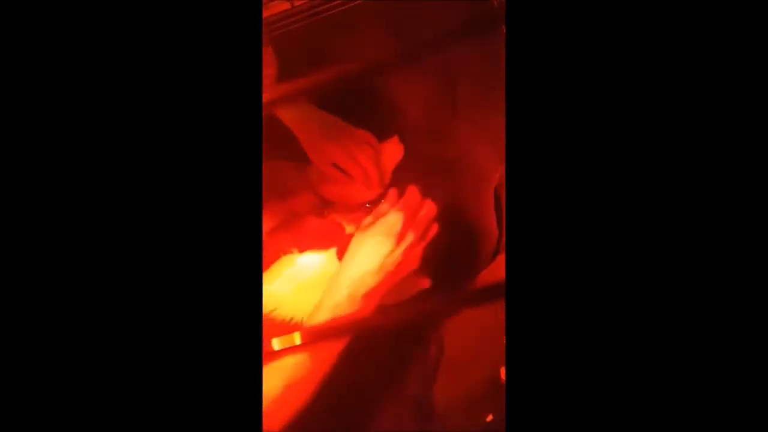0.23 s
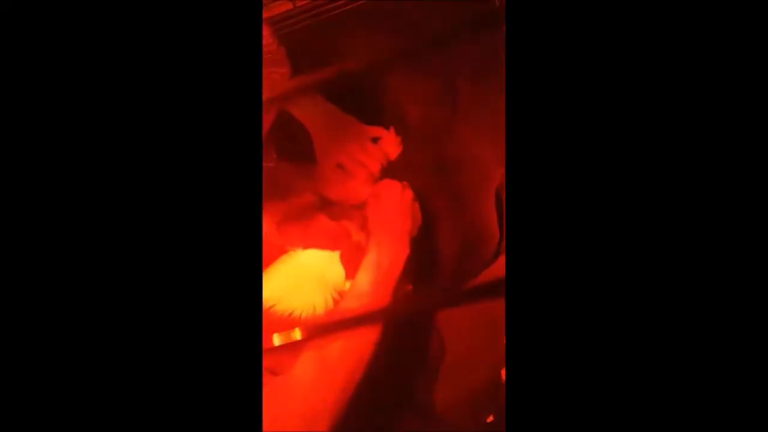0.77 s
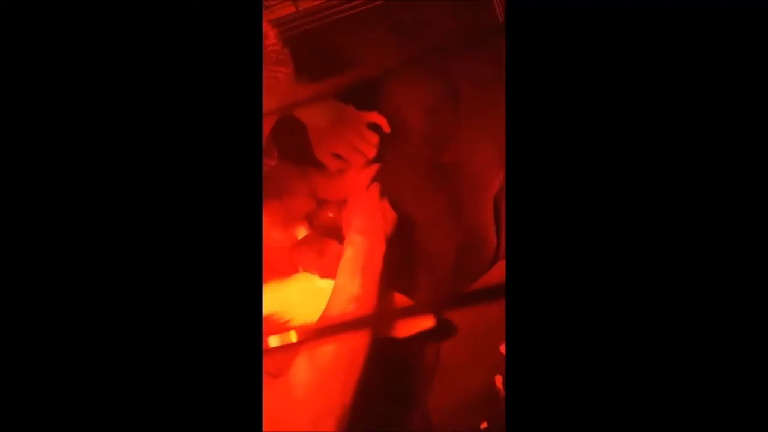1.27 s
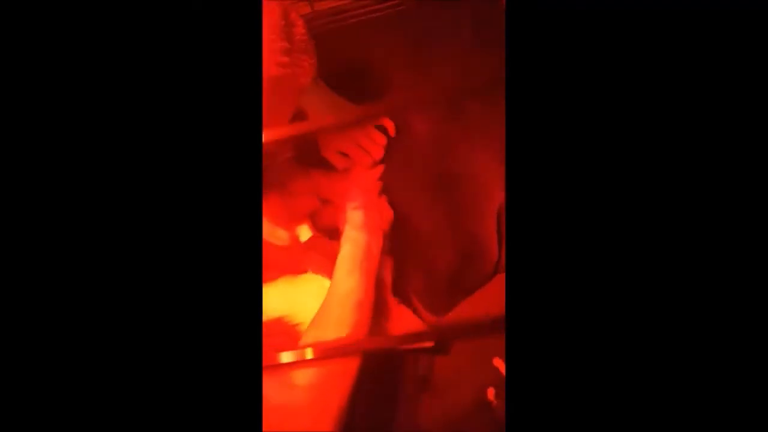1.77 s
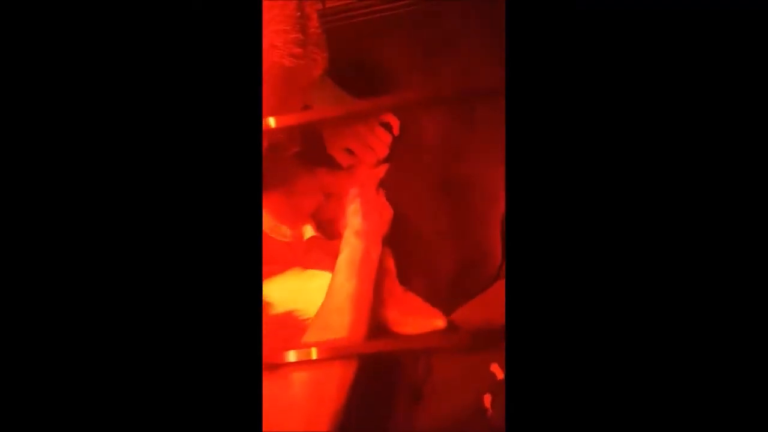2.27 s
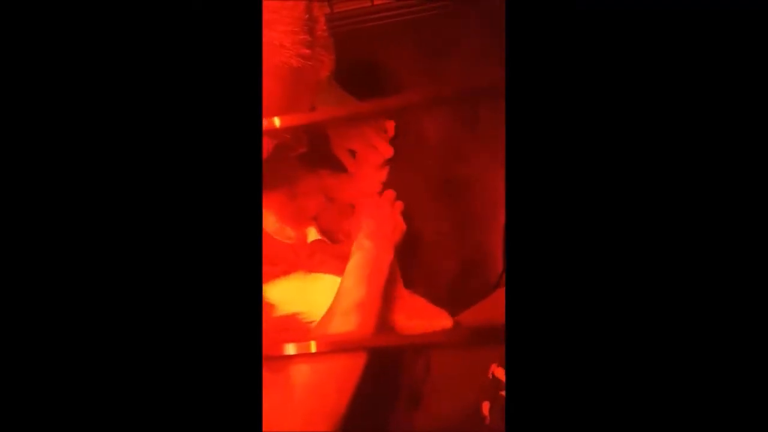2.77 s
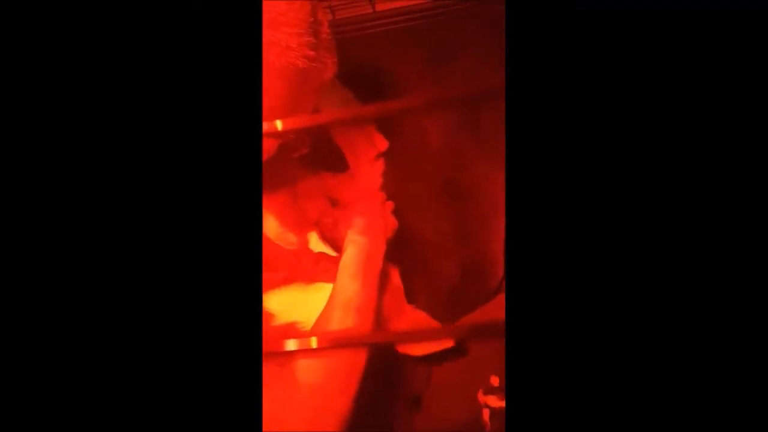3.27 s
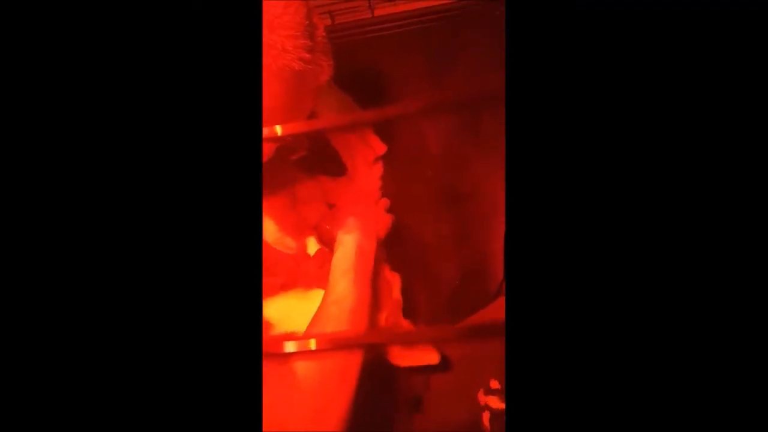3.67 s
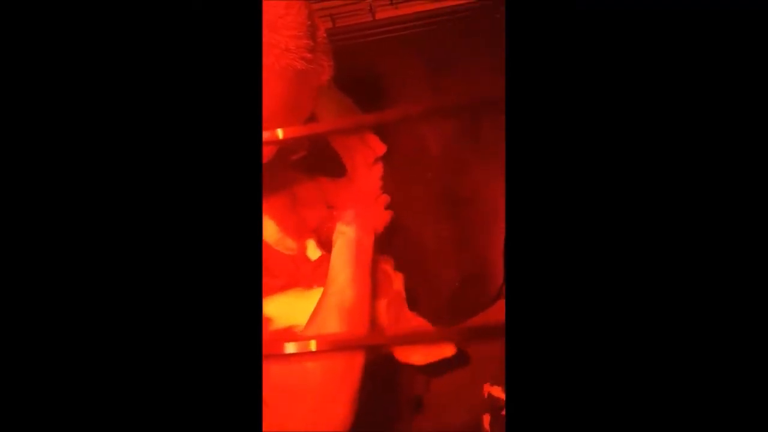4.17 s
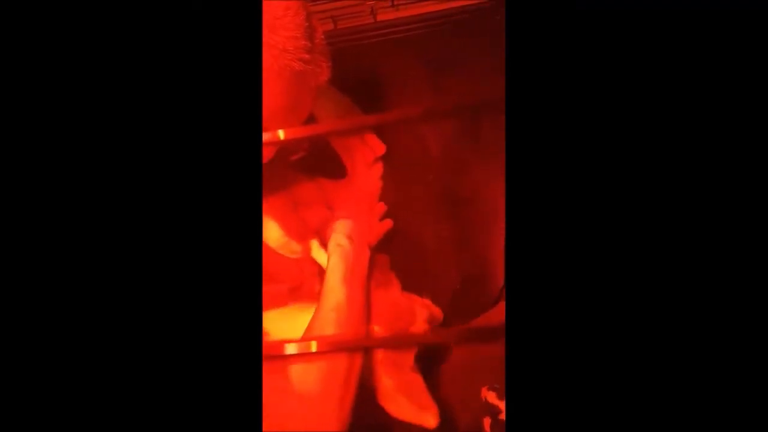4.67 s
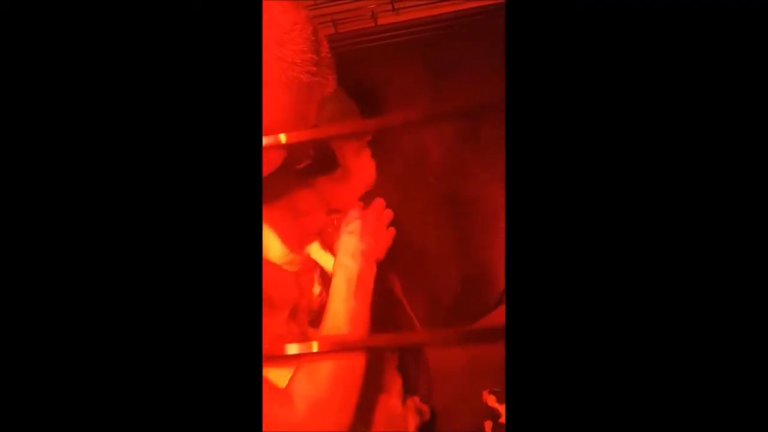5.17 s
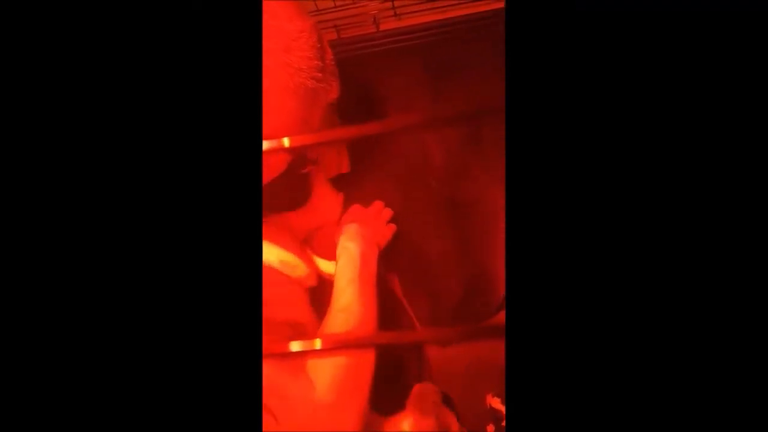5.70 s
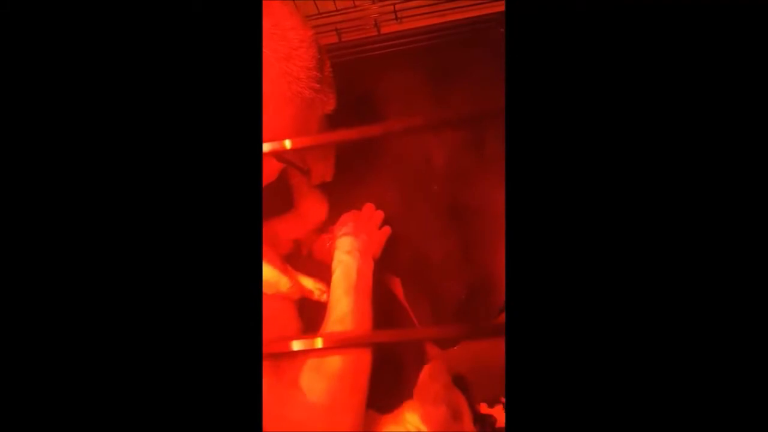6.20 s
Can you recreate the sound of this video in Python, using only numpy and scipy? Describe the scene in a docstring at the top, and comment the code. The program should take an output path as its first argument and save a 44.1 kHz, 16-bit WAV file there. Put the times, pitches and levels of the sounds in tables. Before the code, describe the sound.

Tiny puppy being handled: low hoarse grunts, gliding whines, one piercing squeal, then raspy groans among soft knocks and cloth rustles.

```python
"""In a bedding-lined pen indoors a newborn puppy is handled and cries.
Clear gliding whines, one rising to a squeal, are summed partials over a pulsed breath; groans are jittery fold beats.
Cracks, airy rasps and a faint whistle join them. Hands and paws bump (short two-mode rings) and rustle the
bedding (grainy noise). The room hisses softly in noise bands; a low hum fades in and wavers underneath."""
import sys
import numpy as np
from scipy import signal
from scipy.fft import rfft, irfft
from scipy.io import wavfile
from scipy.ndimage import uniform_filter1d, map_coordinates

SR = 44100
rng = np.random.default_rng(int(sys.argv[2]) if len(sys.argv) > 2 else 0)


def log_audio(samples):
    """Write samples as a 16-bit WAV file to the path given in sys.argv[1]."""
    # one column per channel
    frames = np.atleast_2d(samples).T
    # limit to full scale, then quantise
    limited = np.clip(frames, -1, 1)
    pcm = np.round(limited * 32767).astype(np.int16)
    wavfile.write(sys.argv[1], SR, pcm)


N = 284004
CUTOFF_HZ = 16150

# Clear cries, one list per cry. Each row: time in seconds, pitch in Hz, levels of the
# fundamental, octave and third partial in dB.
CRIES = [
    [(0.87, 586.5, -74, -77, -80), (0.886, 604.2, -55, -59, -77), (0.928, 671.9, -55.5, -49, -63),
     (0.956, 753.5, -48.5, -49, -65.5), (0.996, 853.7, -51, -45, -66), (1.042, 939.0, -49.5, -47, -71),
     (1.07, 942, -62.5, -55.5, -63), (1.138, 922.5, -47.5, -50.5, -67), (1.228, 1010, -68.5, -51.5, -73),
     (1.24, 1023, -50, -57, -77), (1.254, 1042, -55, -48.5, -89), (1.276, 1024, -60, -50, -89),
     (1.31, 1061, -53.5, -52.5, -83), (1.394, 955.5, -55.5, -49.5, -67), (1.458, 931.5, -59.5, -58, -80),
     (1.48, 953.3, -90, -72, -90)],
    [(2.0, 854, -77, -62, -85), (2.026, 855.5, -48.5, -48, -77), (2.048, 1026, -74, -58, -82),
     (2.078, 1065, -44.5, -43.5, -69), (2.104, 1120, -40.5, -50, -75), (2.122, 1124, -46, -51.5, -67),
     (2.144, 1180, -29.5, -41, -68), (2.178, 1160, -34.5, -49, -62.5), (2.186, 1141, -36.5, -54, -67),
     (2.23, 1174, -39.5, -43.5, -66), (2.248, 1147, -40.5, -53, -63), (2.278, 1058, -48.5, -46, -61),
     (2.32, 938, -53.5, -51.5, -66.5), (2.43, 783, -48, -51, -57.5), (2.44, 775.7, -47.5, -50, -68),
     (2.46, 671, -53.5, -50.5, -56), (2.54, 610.1, -53, -49, -57.5), (2.584, 696.0, -52.5, -50.5, -61),
     (2.6, 823.4, -51.5, -51, -59.5), (2.694, 821.5, -50.5, -58, -59.5), (2.78, 882.8, -58, -51, -82),
     (2.83, 946.7, -81, -84, -95)],
    [(3.3, 939, -58, -56, -97), (3.314, 1014, -51, -59.5, -72), (3.356, 1183, -38.5, -46, -87),
     (3.372, 1305, -33, -49, -69)] + [(3.382, 1281, -37, -44, -53), (3.388, 1233, -39, -41.5, -50),
     (3.41, 1261, -42.5, -30.5, -47), (3.442, 1288, -37, -26.5, -42.5), (3.488, 1337, -49, -30, -47),
     (3.496, 1344, -46, -38.5, -39), (3.504, 1338, -64, -24.5, -52), (3.514, 1281, -41.5, -32.5, -48),
     (3.556, 1292, -39.5, -37, -38.5), (3.566, 1262, -40, -47, -56), (3.572, 1287, -42, -38, -49),
     (3.58, 1275, -36.5, -36.5, -58), (3.59, 1297, -33, -62, -58)] + [(3.605, 1306, -35, -56, -68),
     (3.617, 1265, -34, -55, -84), (3.651, 1234, -40, -49, -73), (3.735, 1192, -36.5, -48, -80),
     (3.775, 1136, -42.5, -51.5, -77), (3.817, 1011, -48.5, -45.5, -60), (3.901, 967, -44, -53.5, -57),
     (3.927, 954, -44.5, -48.5, -61), (3.969, 971, -44.5, -60, -55.5), (4.003, 957, -46, -45.5, -69),
     (4.035, 965, -45.5, -57, -62), (4.067, 935, -57.5, -40, -81), (4.095, 921, -42, -47, -81),
     (4.113, 890, -47, -44, -57), (4.121, 902, -41.5, -45, -65.5), (4.197, 862.6, -50, -47.5, -58.5),
     (4.261, 903.4, -49, -44.5, -68), (4.36, 794, -61, -72, -72)],
    [(5.8, 891.4, -67, -65, -89), (5.826, 912.6, -50.5, -84, -84), (5.94, 941.4, -69, -74, -87),
     (5.982, 900.8, -58, -84, -89), (6.024, 964.6, -62, -65, -87), (6.066, 1086, -53, -75, -94),
     (6.098, 1063, -50.5, -52.5, -91), (6.19, 953.3, -58.5, -76, -80)] + [(6.21, 952, -54.5, -57, -86),
     (6.24, 935, -55, -50, -85), (6.27, 903, -56, -50.5, -82), (6.31, 928, -51, -52.5, -85),
     (6.378, 913, -60, -46, -82), (6.424, 867, -55, -53, -87), (6.44, 906, -59, -66, -84)],
]
# Throat colour, mouth open. Each row: frequency in Hz, relative level in dB.
THROAT = [(210, -68.5), (350, -26.5), (652, -9), (737, -5.5), (912, -3.5), (1210, 0), (1490, -8.5),
          (1730, 3), (1980, -7.5), (2240, 0.5), (2660, -19), (4000, -51), (5200, -71), (8800, -120)]


def from_db(db):
    """Decibels to gain."""
    return 10 ** (np.asarray(db) / 20)


def rms_one(x):
    """Scale to rms 1."""
    return x / np.sqrt(np.mean(x ** 2) + 1e-20)


def in_time(rows):
    """Every column after the time column, interpolated sample by sample."""
    s, *columns = np.transpose(rows)
    return [np.interp(np.arange(N) / SR, s, column) for column in columns]


def span(rows):
    """First and last time of a table."""
    return rows[0][0], rows[-1][0]


def per_cry(ends):
    """A value given at the start and end of each cry, sample by sample."""
    rows = []
    for cry, pair in zip(CRIES, ends):
        rows += zip(span(cry), pair)
    return in_time(rows)[0]


def sounding(spans, fade_s):
    """1 while any span (start s, end s) lasts, 0 between, with soft edges."""
    t = np.arange(N) / SR
    on = sum((t >= start) & (t <= end + .011) for start, end in spans) > 0
    return uniform_filter1d(on * 1., size=int(fade_s * SR), mode="nearest")


def at_hz(points, hz):
    """A spectrum in dB read on a log-frequency axis."""
    points = np.array(points)
    return np.interp(np.log(hz), np.log(points[:, 0] + 1), points[:, 1])


def drift(corner_hz):
    """Random wander of rms 1: noise through two equal poles at corner_hz, run at SR / 8."""
    r = np.exp(-16 * np.pi * corner_hz / SR)
    noise = rng.standard_normal(N // 8 + 8002)
    slow = signal.lfilter([1], [1, -2 * r, r * r], noise)[8000:]  # settled part
    return np.interp(np.arange(N) / 8, np.arange(len(slow)), rms_one(slow))


def narrow(hz, corner_hz):
    """Noise squeezed into a thin line around a fixed or moving centre; rms about 1."""
    phase = 2 * np.pi * np.cumsum(hz * np.ones(N)) / SR
    return drift(corner_hz) * np.cos(phase) + drift(corner_hz) * np.sin(phase)


def coloured(x, spectrum):
    """Impose a spectrum in dB per Hz."""
    hz = np.maximum(np.arange(N // 2 + 1) * SR / N, 1)
    return irfft(rfft(x) * from_db(at_hz(spectrum, hz)), N)


def placed(x, pan_db):
    """Nearer the right port: the left hears it a little later; pan_db is left over right."""
    left_lag_s = 0.00013
    late = map_coordinates(x, [np.arange(N) - left_lag_s * SR], order=3)
    return np.array([late * from_db(pan_db / 2), x * from_db(-pan_db / 2)])


def room_noise(patchy_db):
    """Half-octave bands of stereo noise; the low bands shuffle in lumps, the high ones hiss more smoothly."""
    # Each row: time in seconds, low shuffle and hiss in dB (taken about their means, weighted per band).
    room = [(0.0, -69.5, -75), (0.6, -71, -78), (0.88, -70.5, -78), (1.09, -67.5, -71), (1.45, -72, -69),
            (1.7, -72, -80.5), (2.22, -68.5, -72), (2.64, -68.5, -74), (2.83, -72, -78), (3.34, -71.5, -81),
            (3.53, -68, -82.5), (4.11, -71.5, -71), (4.43, -71.5, -74), (4.63, -69.5, -80.5),
            (4.97, -69, -82.5), (5.76, -67.5, -80), (6.44, -68.5, -79)]
    # Room air colour. Each row: frequency in Hz, relative level in dB per Hz.
    air_colour = [(18, -21), (30, 3), (70, -7), (120, -5.5), (340, -5), (650, -9.5), (800, -10),
                  (1720, -10), (2490, -15), (4000, -21.5), (7000, -23), (9500, -29), (13000, -25),
                  (16000, -23.5)]
    # Each row: frequency in Hz, left-right correlation.
    likeness = [(60, 0.53), (180, 0.46), (550, 0.48), (1650, 0.19), (4970, -0.07), (15000, 0.026)]
    shared_wander = .35  # patchiness common to all bands, against 1 for each band's own
    low_db, hiss_db = in_time(room)
    low_db, hiss_db = low_db - low_db.mean(), hiss_db - hiss_db.mean()
    white = coloured(rng.standard_normal((4, N)), air_colour).reshape(2, 2, N)
    edges_hz = 16.22 * 2 ** np.arange(0, 10.1, .5)
    noise, together = 0, drift(0.99)
    for k, (low_hz, high_hz) in enumerate(zip(edges_hz, edges_hz[1:])):
        band = signal.butter(2, [low_hz, high_hz], "band", fs=SR, output="sos")
        mid, side = signal.sosfilt(band, white[k % 2])
        alike = np.clip(at_hz(likeness, np.sqrt(low_hz * high_hz)), -1, 1)
        treble = np.clip(np.log2(low_hz / 400) / 10.0, 0, 1)
        level_db = (1.5 - treble) * low_db + treble * hiss_db
        lumps_db = patchy_db * (2 - 1.13 * treble) * (shared_wander * together + drift(11.6))
        stereo = np.sqrt(1 + alike) * mid + np.sqrt(1 - alike) * side * [[1], [-1]]
        noise = noise + from_db(level_db + lumps_db) * stereo
    return from_db(-61.5) * rms_one(noise) * from_db([[-.7], [.7]])


def hum():
    """A steady low tone plus a narrow noise halo that makes it waver; same waveform in both ports."""
    # Each row: time in seconds, rms level in dB.
    hum_level = [(0.0, -93), (0.6, -92), (1.3, -76), (1.6, -72), (2.06, -68), (3.3, -67.5), (3.9, -67),
                 (6.44, -67.5)]
    hum_hz, halo_corner_hz, halo_share = 49, 3.2, .2
    steady = np.sin(2 * np.pi * hum_hz * np.arange(N) / SR)
    tone = rms_one(steady + halo_share * narrow(hum_hz, halo_corner_hz))
    return from_db(in_time(hum_level)[0]) * tone * from_db([[-1.0], [1.0]])


def pen(x):
    """Walls and bars of the pen: convolution with a short dull noise tail, different in each channel."""
    cut_hz, tail_db, t60_s = 2500, -17, .12
    t = np.arange(SR // 3) / SR
    tail = rng.standard_normal((2, len(t))) * from_db(-60 * t / t60_s) * (t > .002)
    tail = signal.sosfilt(signal.butter(1, cut_hz, fs=SR, output="sos"), tail)
    tail = tail / np.sqrt(np.sum(tail ** 2) / 2)
    return from_db(tail_db) * signal.fftconvolve(x, tail, axes=1)[:, :N]


def rustles(grain_db, rise_s):
    """Bedding cloth crackles: grainy noise that swells fast and dies away exponentially."""
    # Each row: start in seconds, level in dB, t60 in seconds.
    rustle_rows = [(0.711, -66, 0.2), (1.5527, -79, 0.14), (1.7304, -79, 0.053), (1.7585, -66, 0.06),
                   (4.452, -63, 0.16), (4.621, -53, 0.13), (4.64, -62, 0.43), (5.174, -71, 0.15),
                   (5.2196, -53.5, 0.39), (5.7244, -59, 0.2), (5.744, -51, 0.12), (5.7789, -58.5, 0.23),
                   (6.0993, -59, 0.16)]
    # Each row: frequency in Hz, relative level in dB per Hz.
    cloth_colour = [(300, 4.5), (1000, 7.5), (3000, 0), (8000, -8), (16000, -15)]
    t = np.arange(N) / SR
    shape = 0
    for s, db, t60_s in rustle_rows:
        decay = from_db(db - 60 * np.abs(t - s) / max(t60_s, .01))
        shape = shape + np.clip((t - s) / rise_s, 0, 1) * decay
    grains = rng.standard_normal(N) * from_db(grain_db * drift(430))
    return placed(rms_one(coloured(grains, cloth_colour)) * shape, -4.0)


def struck(events, t60_s, cycles, pan_db, puff_share):
    """Each (s, dB, Hz) event rings at two modes with a dull noise puff; t60 is t60_s plus some cycles."""
    second_ratio, second_db = 1.53, -7
    length = 4410
    out, t = np.zeros(N + length), np.arange(length) / SR
    dull = signal.butter(3, 1700, fs=SR, output="sos")
    puffs = rms_one(signal.sosfilt(dull, rng.standard_normal((len(events), length))))
    for (s, db, hz), puff in zip(events, puffs):
        upper = from_db(second_db) * np.sin(2 * np.pi * second_ratio * hz * t)
        ring = np.sin(2 * np.pi * hz * t) + upper
        blow = (ring + puff_share * puff) * from_db(db - 60 * t / (t60_s + cycles / hz))
        soft_contact = np.minimum(t * hz / 1.04, 1)  # full after about one cycle
        out[round(s * SR):][:length] += blow * soft_contact
    return placed(out[:N], pan_db)


def bumps():
    """Hands and paws bump: short impulses, each ringing at its own pitch."""
    # Each row: start in seconds, level in dB, ring in Hz.
    bump_rows = [(0.104, -45, 205), (0.233, -41.5, 577), (0.711, -52.5, 1080), (0.951, -42, 414.6),
                 (1.054, -42, 148.7), (1.109, -48, 303), (1.432, -51, 151.2), (1.501, -52, 580),
                 (1.552, -57, 960), (1.62, -46, 183), (1.846, -44.5, 170.4), (2.846, -48.5, 148.5),
                 (3.093, -36.5, 908), (3.248, -54, 904), (3.499, -45, 160), (4.154, -43, 540),
                 (4.183, -44.5, 176.3), (4.214, -47, 135), (4.449, -40.5, 596), (4.461, -40, 652),
                 (4.477, -50.5, 327), (5.044, -50, 184), (5.19, -41.5, 192.2), (5.1765, -37, 402),
                 (5.2215, -38.5, 681), (5.229, -51, 133.5), (5.67, -48, 127), (5.742, -36, 417.3),
                 (5.825, -35, 414.5), (6.086, -42, 357)]
    return struck(bump_rows, t60_s=.025, cycles=3.0, pan_db=-1.5, puff_share=0.45)


def wheeze():
    """Air through a narrow gap: a faint breathy whistle of narrow noise on a wandering centre."""
    # Each row: time in seconds, rms level in dB.
    whistle_level = [(4.86, -81), (4.92, -68.5), (5.168, -67), (5.2, -75)]
    centre_hz, corner_hz = 1500 * (1 + .012 * drift(12.1)), 70
    whistle = narrow(centre_hz, corner_hz) * from_db(in_time(whistle_level)[0])
    return placed(whistle * sounding([span(whistle_level)], .03), -7.5)


def rasp():
    """A dry, airy rasp: grainy upper-middle noise that swells and fades linearly in dB."""
    # Each row: peak time in seconds, peak rms level in dB, rise and fall in seconds per range_db.
    rasp_rows = [(1.156, -56, 0.075, 0.098), (5.094, -69.5, .07, 0.073), (5.226, -56, 0.052, 0.08),
                 (5.746, -49, 0.034, .12), (6.2, -68, 0.14, 0.057)]
    # Each row: frequency in Hz, relative level in dB per Hz.
    rasp_colour = [(1800, -1), (2400, 3), (3300, 1), (4200, -7), (7000, -38), (12000, -51)]
    range_db = 24
    t = np.arange(N) / SR
    shape = 0
    for s, db, rise_s, fall_s in rasp_rows:
        shape = shape + from_db(db - range_db * np.maximum((s - t) / rise_s, (t - s) / fall_s))
    grains = rng.standard_normal(N) * from_db(3.1 * drift(110))
    return placed(rms_one(coloured(grains, rasp_colour)) * shape, -9.0)


def cracks():
    """Cracks in the voice: short rings at one pitch with a noise puff."""
    # Each row: start in seconds, level in dB.
    crack_rows = [(1.18, -55), (1.342, -43), (1.438, -44.5), (1.459, -48), (2.413, -39), (2.479, -43),
                  (3.377, -43)]
    crack_hz = 1483
    events = [(s, db, crack_hz) for s, db in crack_rows]
    return struck(events, t60_s=0.025, cycles=0, pan_db=-9.5, puff_share=0.35)


def groans(uneven_db, grain_db):
    """Hoarse voice: fold beats jump between registers and jitter, air puffs each beat, the throat colours both."""
    # Registers; the short ones near 500 Hz are rasping starts and ends of cries.
    # Each row: start and end in seconds, fold beats at start and end in Hz,
    # level at start and end in dB, change of the sound below about 1 kHz in dB.
    registers = [(0.0, 0.029, 391.7, 520, -58.5, -58, 3.5), (0.038, 0.063, 559.3, 654, -57, -52, 4),
                 (0.064, 0.157, 305.3, 328, -50, -53, 2), (0.166, 0.218, 391.3, 420, -54, -51.5, 1.5),
                 (0.227, 0.325, 401.7, 388, -49, -48.5, -10.5), (0.85, 0.887, 515.5, 500, -65, -66, 12),
                 (1.416, 1.485, 478, 460, -57, -67, 3), (1.984, 2.041, 534.4, 480, -55, -55, 1.5),
                 (2.788, 2.83, 462, 580, -59.5, -68.5, 12), (3.272, 3.319, 516, 430, -52.5, -58, -2.5),
                 (4.349, 4.392, 540, 500, -52.5, -66.5, 0), (5.18, 5.237, 499.4, 540, -59.5, -58, 9.5),
                 (5.249, 5.31, 543.5, 570, -62.5, -60, 14.5), (5.32, 5.391, 647, 793, -55, -58, 7),
                 (5.397, 5.45, 563, 575, -53.5, -57, 5), (5.457, 5.53, 301.8, 292, -55, -55.5, 5.5),
                 (5.537, 5.6, 249, 243, -55.5, -51.5, 4.5), (5.623, 5.74, 200, 206, -52.5, -53.5, 2),
                 (5.747, 5.958, 439, 463, -51.5, -53, 4), (5.965, 6.04, 449, 480, -48, -56, -2)]
    # Each row: time in seconds, rms beat jitter as a share of the rate.
    fold_jitter = [(0, .012), (.06, .009), (.12, .016), (.2, .02), (.23, .03), (.35, .02), (.84, .3),
                   (5.24, .3), (5.25, .03), (5.33, .012), (5.5, .018), (5.55, .006), (5.62, .007),
                   (5.72, .012), (5.75, .022), (5.81, .012), (6.05, .014)]
    # Throat colour, mouth nearly shut. Each row: frequency in Hz, relative level in dB.
    throat_shut = [(210, -35), (350, -28.5), (559, -11.5), (607, 3.5), (658, -8), (775, -6), (1090, -10),
                   (1250, -4), (1570, -3), (2210, -23), (2400, -18), (4000, -36), (5200, -69), (8800, -120)]
    mouth_opens_s = .5
    air_at_1pct_db, air_db_per_doubling, air_top_db = -6.5, 2.5, 3  # air over beats, by jitter
    wander, wander_corner_hz = .009, 12  # slow rate wander, as a share

    rows = []
    for s0, s1, hz0, hz1, db0, db1, lift_db in registers:
        rows += [(s0, hz0, db0, lift_db), (s1, hz1, db1, lift_db)]
    hz, level_db, low_db = in_time(rows)
    jitter, = in_time(fold_jitter)
    air_db = np.minimum(air_at_1pct_db + air_db_per_doubling * np.log2(100 * jitter), air_top_db)
    unsteady_hz = hz * (1 + jitter * drift(120) + wander * drift(wander_corner_hz))
    phase = 2 * np.pi * np.cumsum(unsteady_hz) / SR

    shut = np.arange(N) < mouth_opens_s * SR
    shares = [from_db(np.where(shut, at_hz(throat_shut, k * hz), at_hz(THROAT, k * hz)))
              for k in range(1, 16)]
    total = np.sqrt(sum(share ** 2 for share in shares) / 2)
    beats = 0
    for k, share in enumerate(shares, start=1):
        beats = beats + share * from_db(uneven_db * drift(33)) * np.cos(k * phase)
    beats = beats / total

    puffs = rng.standard_normal(N) * (1 + .5 * np.cos(phase))
    air = np.where(shut, rms_one(coloured(puffs, throat_shut)), rms_one(coloured(puffs, THROAT)))
    sound = (from_db(air_db) * air - beats) / np.sqrt(1 + from_db(2 * air_db))
    low = signal.sosfiltfilt(signal.butter(3, 1000, fs=SR, output="sos"), sound)
    sound = sound + (from_db(low_db) - 1) * low
    level = from_db(level_db + grain_db * drift(200))
    return placed(sound * level * sounding([row[:2] for row in registers], 0.027), -4.0)


def cries(flutter_db, waver):
    """Steady fold vibration: 13 partials, each fluttering on its own, with a breath pulsed by the folds."""
    # Squeal at full effort. Each row: time in seconds, 7th and higher partials together in dB,
    # harsh wobble of the upper partials in dB, upper mouth resonance in Hz.
    squeal_effort = [(3.37, -76, -20, 7440), (3.386, -63, -4, 7640), (3.406, -49.5, -27, 7570),
                     (3.45, -47, -30, 7700), (3.49, -52, -29, 5700), (3.51, -42.5, -11, 6120),
                     (3.535, -43, -14.5, 6500), (3.558, -61.5, -26, 6435), (3.592, -70.5, -7, 6400),
                     (3.63, -82, -22, 6370)]
    # Mouth colour of the 7th and higher partials. Each row: frequency in Hz, relative level in dB.
    squeal_colour = [(5060, -92), (8600, -57), (9080, -52), (11100, -17.5), (11500, -14), (12600, -18),
                     (14300, -10.5), (15900, -21)]
    # 4th to 6th partial in the squeal, in dB against the 7th and higher together, before the mouth resonance.
    strained_levels_db = [-2.5, -12, -12.5]
    # 4th to 6th partial against the third in a relaxed cry. Each row: frequency in Hz, level in dB.
    overtones = [(2400, 11), (2900, -27.5), (3900, -17.5), (5000, -24), (6200, -24)]
    # Part of the voice that differs between the ports. Each row: frequency in Hz, level in dB.
    port_spread = [(60, -10), (150, -3), (380, -24), (950, -5), (2380, 3.5), (5980, -7), (15000, -1)]
    # Side on which a partial is louder. Each row: frequency in Hz, left over right in dB.
    side_lean = [(600, 4.5), (900, 1), (1150, -10), (1300, 3), (1800, 2.5), (2600, -1.5), (3500, -6),
                 (15000, -7.5)]
    # One row per cry: breath noise at start and end in dB.
    breath_ends_db = [(-61, -93), (-71.5, -68.5), (-68.5, -88.5), (-56, -58.5)]
    # One row per cry: openness of the mouth for the overtones at start and end in dB.
    bright_ends_db = [(-17, 8), (-10, -12.5), (-1, 3), (-10, -10)]
    # The head turns. One row per cry: left-over-right shift at start and end in dB.
    turn_ends_db = [(-2.35, -0.5), (0.32, -8), (2.3, -5.5), (-2, -7.5)]
    ring_peak_db, ring_half_width_hz = 17, 325  # upper mouth resonance
    # the pen's reflections make the port difference wander at random
    spread_wander, spread_corner_hz = 0.4, 12.6

    hz, *levels_db = in_time(np.vstack(CRIES))
    breath_db, bright_db = per_cry(breath_ends_db), per_cry(bright_ends_db)
    turn_db = per_cry(turn_ends_db)
    top_db, harsh_db, ring_hz = in_time(squeal_effort)
    phase = 2 * np.pi * np.cumsum(hz * (1 + waver * drift(50.0))) / SR
    strained = sounding([span(squeal_effort)], .006)

    gains = [np.sqrt(2) * from_db(db) for db in levels_db]
    for k, strained_db in enumerate(strained_levels_db, start=4):
        ring_db = ring_peak_db / (1 + ((k * hz - ring_hz) / ring_half_width_hz) ** 2)
        relaxed_gain = gains[2] * from_db(bright_db + at_hz(overtones, k * hz))
        gains.append(relaxed_gain + strained * from_db(top_db + strained_db + ring_db))
    shares = [from_db(at_hz(squeal_colour, k * hz)) * (k * hz < CUTOFF_HZ) for k in range(7, 14)]
    total = np.sqrt(sum(share ** 2 for share in shares) / 2)
    gains += [from_db(top_db) * strained * share / total for share in shares]

    harsh = strained * from_db(harsh_db) * drift(500)  # fast wobble puts noise between the partials
    husky = 1 + np.minimum(from_db(breath_db + 42.5), .4) * drift(150)  # breathy voice beats unevenly
    voice = 0
    for k, gain in enumerate(gains, start=1):
        harshness = 1 + harsh * np.clip((k - 2) / 3, 0, 1.5)
        gain = gain * husky * from_db(flutter_db * drift(22)) * harshness
        # quadrature part of opposite sign: the left port hears each partial later
        wandering = 1 + spread_wander * drift(spread_corner_hz)
        apart = from_db(at_hz(port_spread, k * hz)) * wandering * [[-1], [1]]
        lean = from_db((at_hz(side_lean, k * hz) + turn_db) * np.array([[.5], [-.5]]))
        angle = k * phase + k * k
        partial = np.sin(angle) + apart * np.cos(angle)
        voice = voice + gain * partial * 2 * lean / lean.sum(axis=0)

    breath = rms_one(coloured(rng.standard_normal(N), THROAT)) * (1 + 0.15 * np.cos(phase))
    breath = placed(from_db(breath_db + 2.1 * drift(23)) * breath, -1.4)
    return (voice + breath) * sounding(map(span, CRIES), 0.0066)


def scene():
    """Everything near sounds in the pen; room noise and hum lie underneath."""
    voice = cries(flutter_db=1.4, waver=.0035) + cracks()  # waver: rms share of the pitch
    voice = voice + groans(uneven_db=2.7, grain_db=1.5)
    handling = bumps() + rustles(grain_db=3.5, rise_s=.002)
    near = voice + handling + rasp() + wheeze()
    return near + pen(near) + room_noise(patchy_db=1.5) + hum()


def record(dry):
    """The converter sits slightly off zero; a steep low-pass cuts the top."""
    offset = -.0005
    top_cut = signal.cheby2(18, 70, CUTOFF_HZ, fs=SR, output="sos")
    return signal.sosfilt(top_cut, dry) + offset


dry = scene()
out = record(dry)
log_audio(out)
```